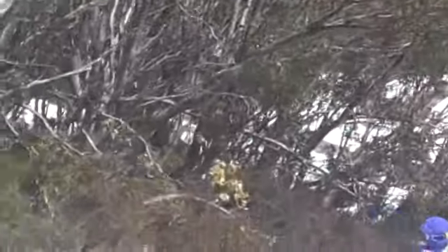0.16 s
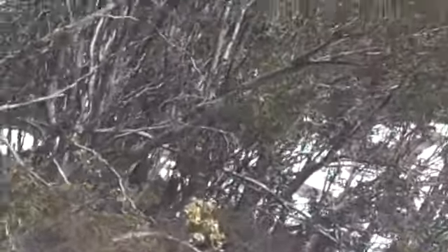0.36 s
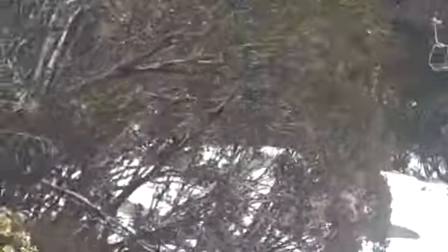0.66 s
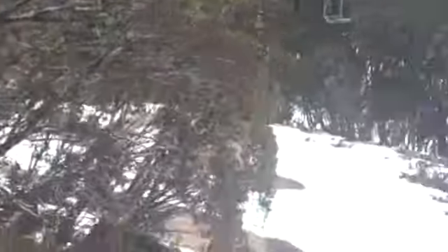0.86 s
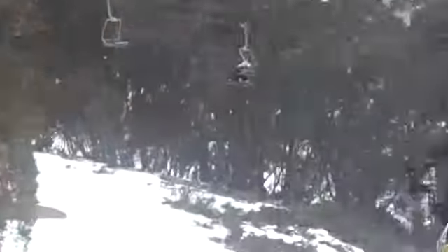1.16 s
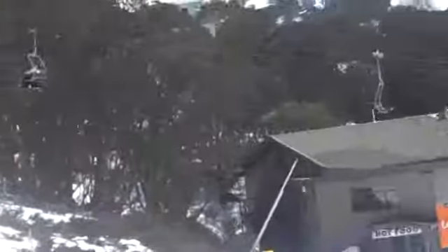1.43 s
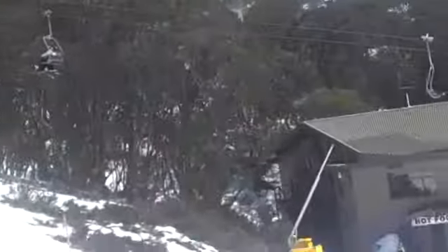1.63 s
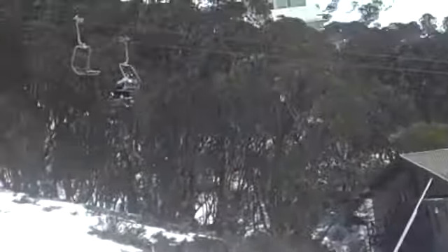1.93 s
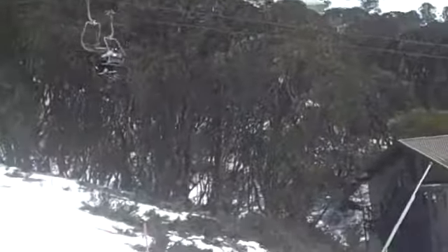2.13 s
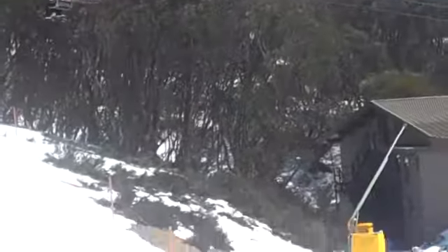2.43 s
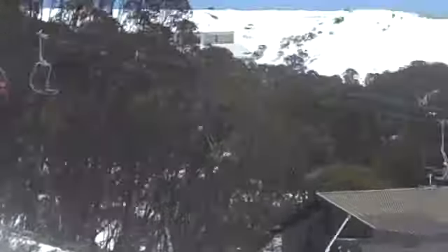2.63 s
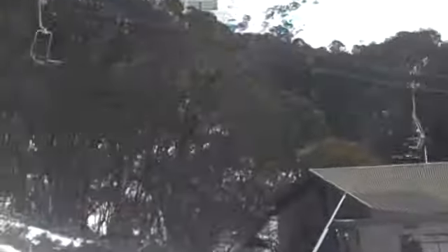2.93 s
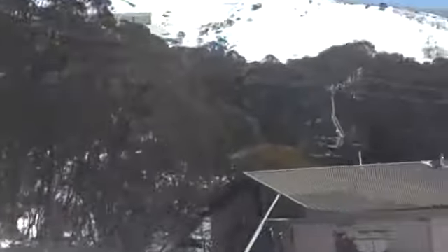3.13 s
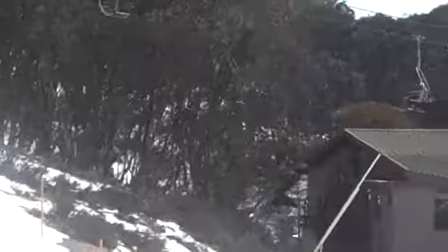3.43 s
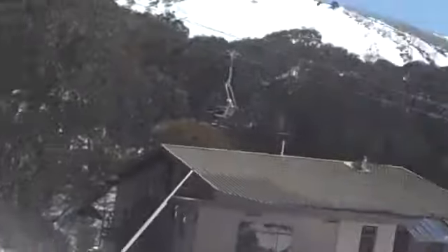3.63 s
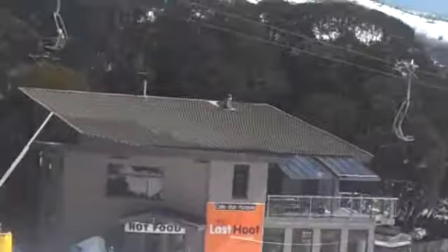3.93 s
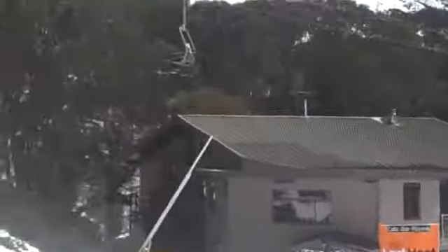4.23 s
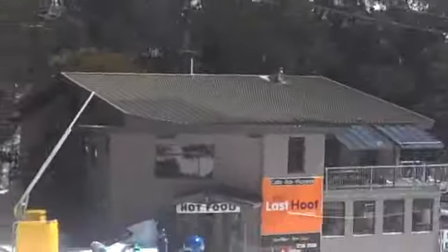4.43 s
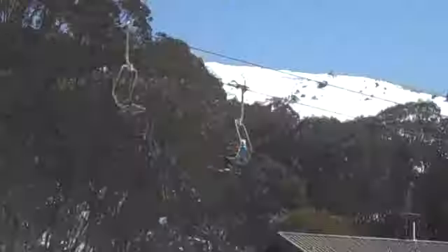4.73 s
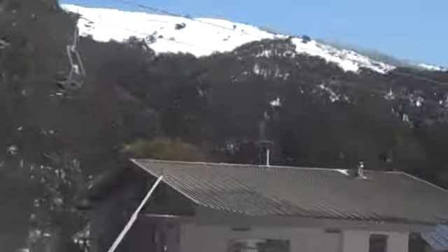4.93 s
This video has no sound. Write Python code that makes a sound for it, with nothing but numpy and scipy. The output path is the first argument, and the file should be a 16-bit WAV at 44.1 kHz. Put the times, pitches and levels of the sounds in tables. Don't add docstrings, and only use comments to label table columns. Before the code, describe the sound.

A close, constant rushing hiss of skis on granular snow swells and dips quickly, with brief plastic knocks and soft wind flutter underneath.

```python
import sys
import numpy as np
from scipy import signal
from scipy.fft import rfft, irfft, dct, next_fast_len
from scipy.io import wavfile
from scipy.ndimage import uniform_filter1d, map_coordinates

SR = 44100
rng = np.random.default_rng(int(sys.argv[2]) if len(sys.argv) > 2 else 0)


def pcm_store(signal):
    levels = np.round(np.clip(np.atleast_2d(signal), -1, 1) * 32767)
    wavfile.write(sys.argv[1], SR, levels.astype(np.int16).T)


def volts(x):
    e = np.asarray(x, float) / 20
    return 10 ** e


N = 223438

# time_s, hiss_db, extra_spray_db
GLIDE = [(0.0, -40.5, 0.6), (0.46, -44, 0.95), (0.92, -40, 0.6), (1.38, -44.5, -0.5), (1.84, -41.0, 0.4),
         (2.3, -39.5, 0), (2.76, -42.5, 1.13), (3.22, -41.5, -1.2), (3.68, -40, -0.7), (4.14, -41.5, 0.7),
         (4.6, -40.5, -0.36), (5.06, -42, -0.5)]
# time_s, half_length_s, swell_db
RIDGES = [(0.228, 0.036, 1.5), (0.391, 0.026, 1.2), (0.875, 0.011, 0.7), (1.027, 0.015, 2.5),
          (1.117, 0.024, 3.5), (1.229, 0.039, 3.5), (1.505, 0.065, 6.5), (1.506, 0.009, 1.0),
          (1.603, 0.026, 2.5), (1.698, 0.019, 4), (1.823, 0.027, 4), (2.184, 0.0075, 3),
          (2.391, 0.074, 0.55), (2.643, 0.023, 2), (2.876, 0.021, 2.5), (3.004, 0.016, 4.5),
          (3.106, 0.01, 4), (3.229, 0.027, 2.5), (3.356, 0.011, 3), (3.68, 0.01, 1.7), (3.819, 0.01, 1.5),
          (3.874, 0.0096, 3), (4.044, 0.012, 1.5), (4.271, 0.047, 1.5), (4.438, 0.015, 2),
          (4.701, 0.015, 3.5), (4.924, 0.013, 3), (5.014, 0.02, 3)]
# time_s, half_length_s, sag_db
HOLLOWS = [(0.308, 0.015, 3.5), (0.582, 0.024, 3), (0.808, 0.014, 2.5), (0.968, 0.0053, 2),
           (1.367, 0.016, 1), (1.444, 0.0087, 7.5), (1.541, 0.0088, 3.5), (1.864, 0.013, 4),
           (1.98, 0.017, 7), (2.071, 0.011, 3), (2.258, 0.023, 4.0), (2.53, 0.058, 2), (2.709, 0.028, 2.5),
           (3.151, 0.02, 2), (3.273, 0.014, 2), (3.437, 0.028, 2.5), (3.617, 0.017, 3),
           (3.717, 0.0073, 3.5), (3.783, 0.0067, 5.5), (3.908, 0.009, 3.7), (4.134, 0.011, 3.3),
           (4.192, 0.014, 4.5), (4.533, 0.041, 1.5), (4.62, 0.015, 2), (4.734, 0.012, 4), (4.856, 0.062, 2),
           (4.964, 0.0078, 3.5)]
# pitch_hz, level_db
SNOW_COLOUR = [(60, -44), (250, -12.5), (450, -4.5), (900, 0.5), (1500, -1), (1800, -2), (2300, -21)]
# pitch_hz, level_db
SPRAY_COLOUR = [(1400, -45), (1800, -4.5), (2200, -1), (3500, 0.5), (4100, -1.5), (5150, 1), (5500, -6),
                (5900, 1), (7500, -5)]
# time_s, peak_db, pitch_hz
CLACKS = [
    (2.3773, -14, 1500),
    (2.4073, -12, 1400),
    (2.203, -21, 1100),
    (3.0, -21, 1360),
    (4.703, -22, 900),
]
# time_s, half_length_s, flutter_db
GUSTS = [(0.008, 0.053, -62), (0.23, 0.027, -44.5), (0.299, 0.042, -48), (0.652, 0.026, -58),
         (0.785, 0.022, -58.5), (0.847, 0.11, -60.5), (1.007, 0.017, -48), (1.152, 0.038, -61.5),
         (1.257, 0.035, -52), (1.395, 0.045, -50.5), (1.62, 0.012, -52.5), (1.621, 0.077, -56),
         (1.702, 0.021, -52), (1.898, 0.063, -49), (2.022, 0.04, -48.5), (2.133, 0.017, -49),
         (2.256, 0.031, -65), (2.596, 0.02, -59), (2.703, 0.036, -59.5), (3.075, 0.056, -53.5),
         (3.202, 0.018, -57), (3.807, 0.02, -56), (3.897, 0.016, -58), (4.007, 0.1, -62.5),
         (4.208, 0.047, -55), (4.356, 0.059, -51.5), (4.548, 0.027, -50.5), (4.784, 0.078, -51),
         (5.007, 0.037, -56.5)]
# pitch_hz, level_db
THUD_COLOUR = [(8, 2), (30, 0), (60, -4), (95, -6), (130, -22)]
# pitch_hz, level_db
FLUTTER_COLOUR = [(85, -30), (130, 1), (190, 0.5), (300, -3), (420, -18)]
# time_s, peak_db, pitch_hz
THUMPS = [(0.216, -44.5, 97), (0.293, -39, 108), (0.337, -48, 106), (0.429, -50, 78), (0.642, -43, 108.8),
          (0.833, -49, 101), (1.253, -48.5, 100), (1.422, -51, 86.6), (1.554, -48, 87.5),
          (1.619, -40, 100.8), (1.698, -44, 93), (1.901, -49, 99), (1.931, -41, 128), (2.028, -44, 87.5),
          (2.128, -40, 110), (2.238, -49, 63), (2.366, -48.5, 79), (2.432, -50, 107), (2.598, -52.5, 89.5),
          (3.213, -49.5, 126), (3.914, -49, 85), (3.984, -52.5, 109), (4.06, -45, 109), (4.176, -47.5, 92),
          (4.246, -45, 106), (4.311, -51, 127), (4.571, -51.5, 130), (4.76, -47.5, 100), (4.819, -46, 95),
          (4.989, -51.5, 79.4)]
# start_s, length_s, blocks_on_in_every_three
TOP_SPELLS = [(.054, .048, 3), (.182, .032, 2), (.278, .064, 3), (.39, .016, 1), (.518, .064, 1),
              (.646, .096, 2), (.87, .064, 2), (.982, .016, 1), (1.078, .192, 2), (1.414, .016, 1),
              (1.494, .032, 2), (1.814, .016, 1), (1.91, .032, 2), (2.038, .016, 1), (2.102, .016, 1),
              (2.326, .016, 1), (2.39, .064, 1), (2.47, .08, 2), (2.79, .016, 1), (3.11, .016, 1),
              (3.494, .112, 3), (3.734, .032, 2), (3.83, .032, 2), (4.006, .096, 3), (4.182, .016, 1),
              (4.246, .032, 2), (4.31, .016, 1), (4.406, .24, 2), (4.694, .032, 2), (4.79, .032, 2)]
DARK_FRAMES = [0.038, 0.806, 1.446, 1.734, 1.958, 1.99, 2.726, 2.758, 3.302, 3.782, 3.91, 4.87, 4.902]
# pitch_hz, step_db
STEP_SIZE = [(300, -.7), (1500, 0), (2300, .7), (3400, 3), (6000, 2.5), (7300, 2), (8000, 0)]
# low_hz, high_hz, chance, level_re_step_db
NOISE_BANDS = [(4000, 4400, .26, -14), (4400, 5300, .15, -12), (5300, 6400, .3, -15)]
# pitch_hz, gain_db
LEAK = [(7000, -1), (7600, -2), (8000, -3.5), (8700, -23.5), (9100, -43.5), (9400, -68), (9600, -120)]

CAMERA_SR, FRAME, LEAD = 16000, 512, 155


def skis():
    bumps = wobble(25)
    weight_db, dry_db = curves(GLIDE)
    ridge_db, hollow_db = humps(RIDGES), humps(HOLLOWS)
    hiss_db = weight_db + 1.1 * ridge_db - 0.8 * hollow_db + 0.3 * wobble(14)
    spray_db = weight_db + dry_db + 8 + 1.1 * ridge_db - 1.4 * hollow_db + 0.2 * wobble(14)
    crushed = coloured(crystals(grit_db=1.0, patchy_db=1.02), SNOW_COLOUR)
    thrown = coloured(crystals(grit_db=1.5, patchy_db=1.57), SPRAY_COLOUR)
    return volts(hiss_db + 0.68 + 0.6 * bumps) * crushed + volts(spray_db + 0.7 * bumps) * thrown


def crystals(grit_db, patchy_db):
    z = signal.stft(rng.standard_normal(N + 512), nperseg=512)[2]
    patches = uniform_filter1d(rng.standard_normal(z.shape), size=5, axis=0)
    patches = unit(uniform_filter1d(patches, size=5, axis=1))
    noise = signal.istft(z * volts(patchy_db * patches), nperseg=512)[1][:N]
    return noise * volts(grit_db * wobble(400))


def clacks():
    out, t = np.zeros(N + SR), np.arange(600) / SR
    since_peak = t - 0.0004
    ring = 0.35 * np.sin(2 * np.pi * 850 * t) * volts(-60 * t / 0.02)
    for s, db, hz in CLACKS:
        push = -np.cos(2 * np.pi * hz * since_peak) * np.exp(-(since_peak / 0.00025) ** 2)
        out[round(s * SR):][:len(t)] += volts(db) * (push + ring)
    return out[:N]


def wind():
    s, half, db = np.transpose(GUSTS)
    gusts = humps(np.c_[s, half, volts(db + 2.5)])
    slow = unit(volts(1.8 * wobble(21)) * coloured(rng.standard_normal(N), THUD_COLOUR))
    fast = unit(volts(3.5 * wobble(24)) * coloured(rng.standard_normal(N), FLUTTER_COLOUR))
    thud = (volts(-14) * gusts + volts(-59.5)) * slow
    flutter = (gusts + volts(-59)) * fast
    return thud + flutter + thumps()


def thumps():
    half = 2000
    out, t = np.zeros(N + SR), np.arange(-half, half) / SR
    for (s, db, hz), turn in zip(THUMPS, rng.random(len(THUMPS))):
        swing = np.cos(2 * np.pi * (hz * t + turn)) * np.exp(-0.5 * (t / 0.0072) ** 2)
        out[round(s * SR):][:len(t)] += volts(db) * swing
    return out[half:][:N]


def unit(x):
    return x / np.sqrt(np.mean(x ** 2) + 1e-20)


def along(points, hz):
    f, v = np.transpose(points)
    return np.interp(np.log(hz + 1), np.log(f + 1), v)


def curves(rows):
    s, *cols = np.transpose(rows)
    return [np.interp(np.arange(N) / SR, s, c) for c in cols]


def wobble(rate):
    knots = rng.standard_normal(int(N * rate / SR) + 4)
    return map_coordinates(knots, [np.arange(N) * rate / SR])


def coloured(x, spectrum):
    m = next_fast_len(N + 8192)
    gain = volts(along(spectrum, np.fft.rfftfreq(m, 1 / SR)))
    return unit(irfft(rfft(x, m) * gain, m)[:N])


def humps(rows):
    t, out = np.arange(0, N, 32) / SR, 0
    for s, half, height in rows:
        out = out + height * np.exp(-0.5 * ((t - s) / half) ** 2)
    return np.interp(np.arange(N) / SR, t, out)


def scene():
    return np.tile(skis() + clacks() + wind(), (2, 1))


def fold(x, edges, way):
    x, size = x.copy(), np.diff(edges)
    for edge, wide in zip(edges[1:-1], np.minimum(size[:-1], size[1:])):
        k = np.arange(wide // 2)
        turn = np.pi / 4 - np.pi * (k + 0.5) / (2 * wide)
        left, right = x[edge - 1 - k], x[edge + k]
        x[edge - 1 - k] = np.cos(turn) * left + way * np.sin(turn) * right
        x[edge + k] = np.cos(turn) * right - way * np.sin(turn) * left
    return x


def top_band(s, long, dark, die, odd):
    start, length, on = np.transpose(TOP_SPELLS)
    inside = (start < s) & (s < start + length)
    scatter_db = 2.86 * odd
    if np.any(inside & ((s - start) / 0.016 % 3 < on)):
        return volts(-33.5 + scatter_db)
    return volts(-45.5 + scatter_db) * ((long or die < 0.28) and not dark)


def pack(lines, s, long, dark, noise, dice, scatter):
    hz = (np.arange(len(lines)) + 0.5) * CAMERA_SR / 2 / len(lines)
    loud = np.sqrt(np.mean(lines[(hz > 500) & (hz < 4000)] ** 2) + 1e-12)
    step = loud * volts(along(STEP_SIZE, hz) + 5.2 + scatter[3])
    out = np.round(lines / step) * step * (hz < 6000)
    for (lo, hi, chance, db), die, odd in zip(NOISE_BANDS, dice, scatter):
        band = (hz > lo) & (hz < hi)
        if long or die < chance:
            out[band] = (step * volts(db + 2 * long + 2.5 * odd) * noise)[band]
    top = (hz > 6400) & (hz < 7290)
    out[top] = top_band(s, long, dark, dice[3], scatter[4]) * noise[top]
    sunk_db = 10 * (dark or long) * (hz > 6300)
    return np.where(out == 0, step * volts(-28.5 - sunk_db) * noise, out)


def frame_of(times):
    return ((np.array(times) * CAMERA_SR + LEAD) // FRAME).astype(int)


def camera_blocks(x):
    frames = len(x) // FRAME + 2
    x = np.pad(x, (0, frames * FRAME - len(x)))
    dark = np.isin(np.arange(frames), frame_of(DARK_FRAMES))
    long = dark | np.isin(np.arange(frames), frame_of(HOLLOWS)[:, 0])
    noise = rng.uniform(-1, 1, len(x)) * np.sqrt(3)
    dice = rng.random((len(x), 4))
    scatter = np.clip(rng.standard_normal((len(x), 5)), -1.5, 1.5)
    halves = (np.flatnonzero(~long) + 0.5) * FRAME
    edges = np.sort(np.r_[np.arange(frames + 1) * FRAME, halves]).astype(int)
    x = fold(x, edges, 0.96)
    for a, b in zip(edges[:-1], edges[1:]):
        frame = a // FRAME
        middle_s = (a + 0.25 * (b - a) + FRAME / 8 - LEAD) / CAMERA_SR
        block_dice = np.r_[dice[a, :3], dice[frame * FRAME, 3]]
        lines = dct(x[a:b][::-1], type=4, norm="ortho")
        lines = pack(lines, middle_s, long[frame], dark[frame], noise[a:b], block_dice, scatter[a])
        x[a:b] = dct(lines, type=4, norm="ortho")[::-1]
    return fold(x, edges, -1.016)[LEAD:]


def raise_rate(x):
    x = np.pad(x, (0, -len(x) % 160))
    low = rfft(x)
    both = np.r_[low, np.conj(low[-2:0:-1])]
    m = len(x) * 441 // 160
    both *= volts(along(LEAK, np.arange(len(both)) * CAMERA_SR / len(x))) * m / len(x)
    return np.pad(irfft(both, m), (1, 0))[:N]


def band_limit(x):
    return signal.sosfilt(signal.butter(12, 9240, fs=SR, output="sos"), x)


def record(dry):
    low_rate = np.pad(signal.resample_poly(dry[0, 1:], 160, 441), (LEAD, 0))
    mono = raise_rate(camera_blocks(low_rate))
    return band_limit(np.tile(mono, (2, 1)))


dry = scene()
out = record(dry)
pcm_store(out)
```